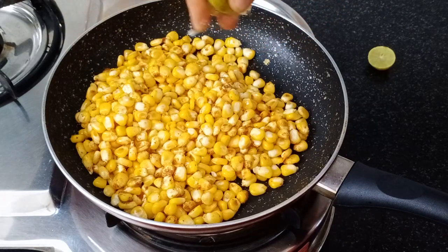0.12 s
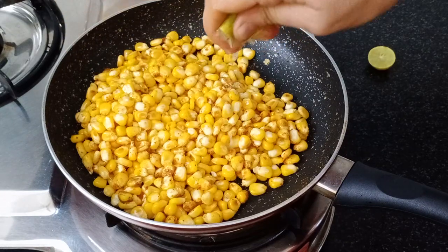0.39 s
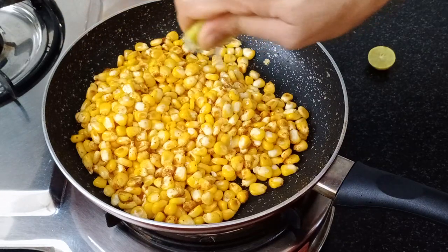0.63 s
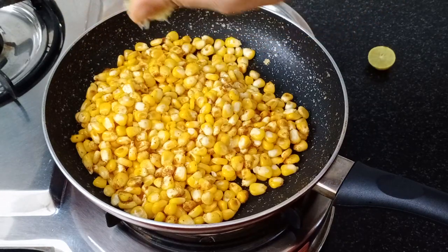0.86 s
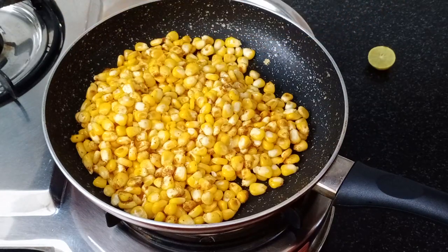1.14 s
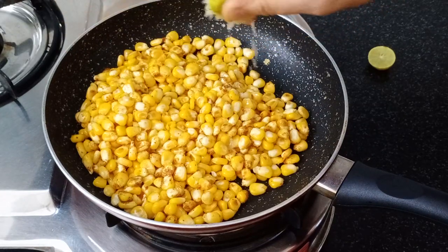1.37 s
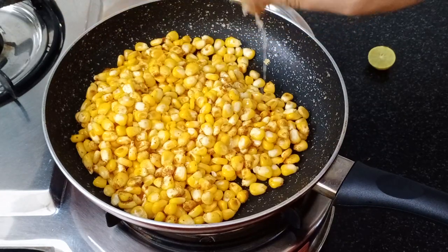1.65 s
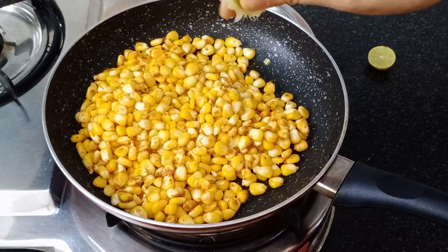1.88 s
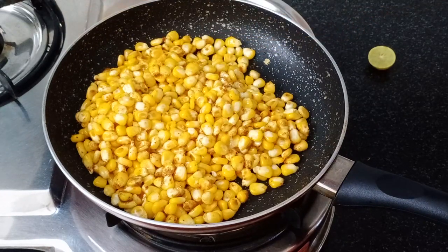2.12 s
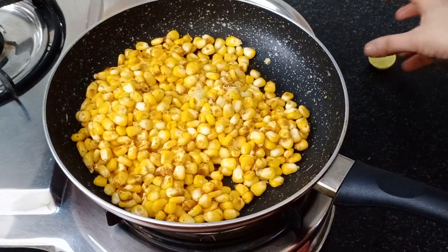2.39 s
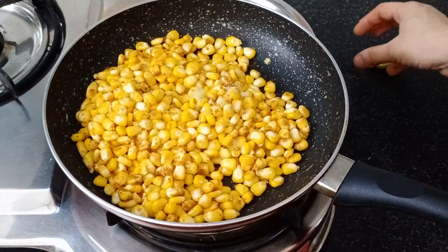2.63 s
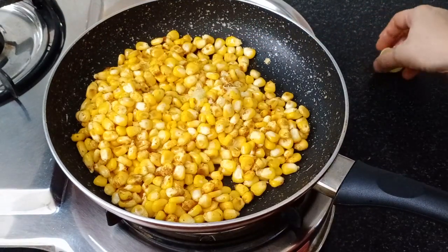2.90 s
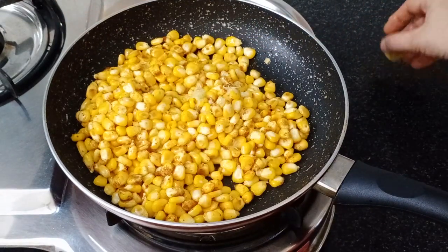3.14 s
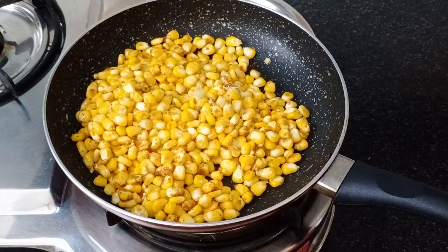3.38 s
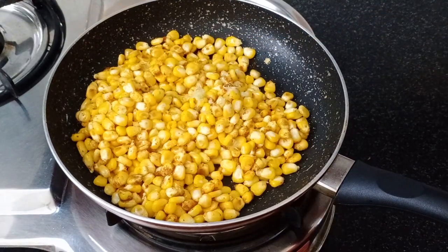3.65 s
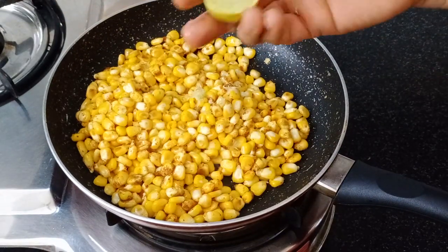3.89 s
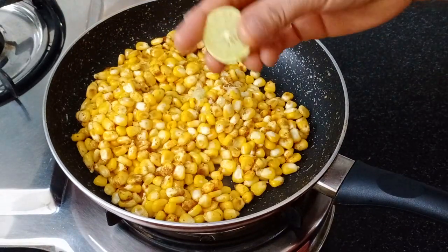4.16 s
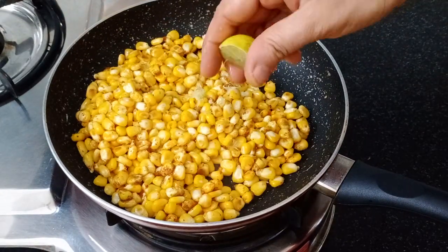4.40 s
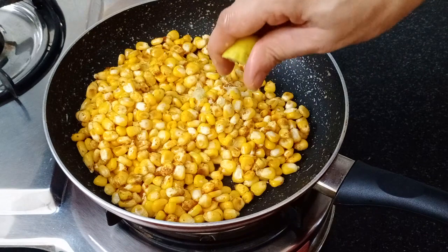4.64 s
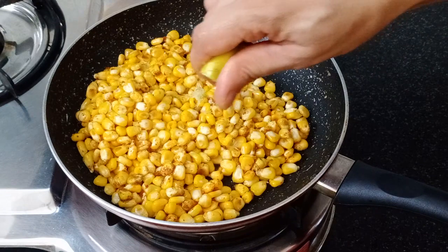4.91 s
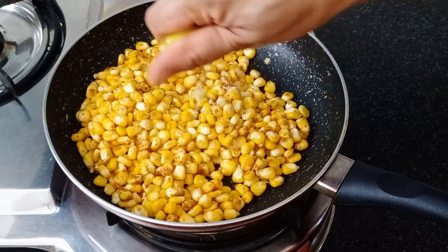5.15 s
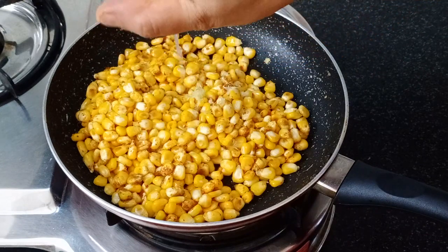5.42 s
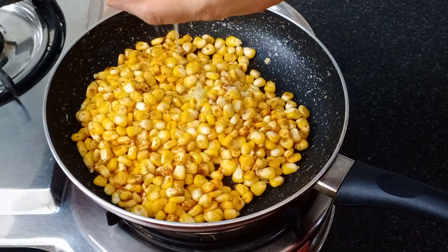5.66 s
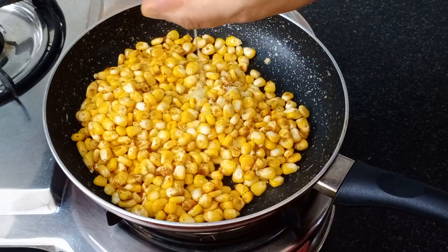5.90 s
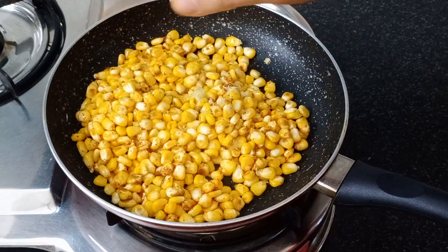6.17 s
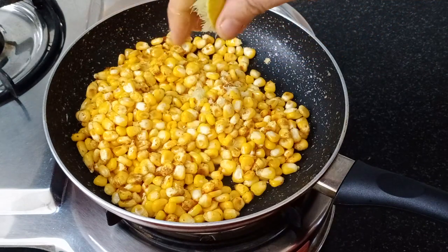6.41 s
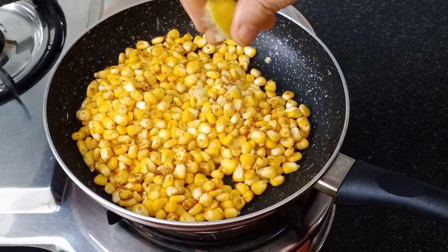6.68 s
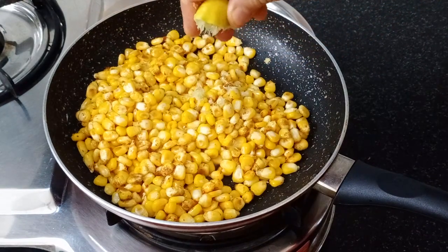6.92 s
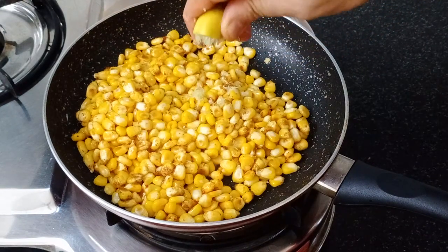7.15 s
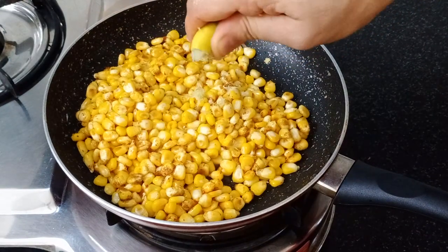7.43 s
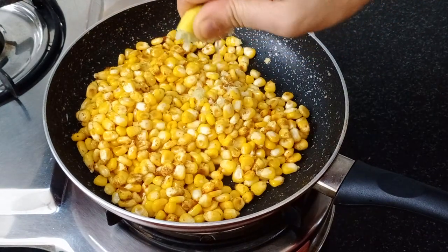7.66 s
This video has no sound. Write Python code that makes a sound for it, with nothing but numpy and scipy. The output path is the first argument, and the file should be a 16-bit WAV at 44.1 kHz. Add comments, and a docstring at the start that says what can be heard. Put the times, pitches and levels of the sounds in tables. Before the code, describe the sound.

Buttered corn wet with lemon juice fries in a hot pan, close to one small microphone in a kitchen. Dense bright crackle and hiss carry frequent sharp spits at first and grow slightly louder. Around two seconds the sound cuts out for a tenth of a second, then returns thinner and gradually calmer, with fewer pops. Later the sizzle swells a little, fuller, with a soft knock over faint low hum.

```python
"""Buttered corn wet with lemon juice sizzles in a hot pan, heard close by one small microphone.
Steam bubbles burst as random clicks over hiss, fizzing fat adds short pitched rings, and the pan resonates.
Sharp spits echo once, brief tones swell and fade, and a soft knock falls amid low hum and rumble of noise.
A noise suppressor thins the lows in patches; the sound drops out for a tenth of a second."""
import sys
import numpy as np
from scipy import signal
from scipy.fft import rfft, irfft
from scipy.io import wavfile
from scipy.ndimage import uniform_filter1d

SR = 44100
rng = np.random.default_rng(int(sys.argv[2]) if len(sys.argv) > 2 else 0)


def linear_from_db(decibels):
    """Turn decibels (scalar or array-like) into linear amplitude factors; 0 gives 1."""
    return 10 ** (np.asarray(decibels, float) / 20)


def file_out(sig):
    """Save sig as 16-bit WAV at sys.argv[1]."""
    # one column per channel
    cols = np.atleast_2d(sig).T
    # limit, then scale
    lim = np.clip(cols, -1, 1)
    pcm = np.round(lim * 32767).astype(np.int16)
    wavfile.write(sys.argv[1], SR, pcm)


N = 343980
FREQS = np.arange(N // 2 + 1) * SR / N + 1e-3   # spectrum bins [Hz], kept above zero for the logarithm

# colour of a burst at the microphone: (frequency [Hz], relative density [dB per Hz])
BURST_COLOUR = [(300, -37.5), (600, -24.5), (1150, -17.5), (1270, -13.5), (2050, -11.5), (2950, -9.5),
                (4600, -6), (6550, -4), (7450, -14.5), (9260, -31), (9850, -29), (11450, -27.5),
                (12350, -21.5), (15600, -16.5)]


def frying():
    """Source-filter principle: burst noise excites pan and microphone; band gains follow a set course."""
    # course of the frying: (time [s], main-band level [dB], low-band lift [dB],
    # bubble size as added body [dB], pan ringing [dB])
    course = [(0.0, -37.5, 1, 1.5, 0.5), (0.3, -37, 0.5, 1, 2.5), (0.62, -38.5, 2.5, 2, 2),
              (0.85, -36, -1.5, 1, -0.5), (1.15, -37, 2, .5, 1.5), (1.35, -35, -1, -2, 3),
              (1.65, -34.5, 1.5, -1, 2.5), (2.09, -34.5, 0.5, -0.5, -2), (2.214, -36, 4, 0.5, 0),
              (2.27, -38.5, -3.5, 1.5, 0), (2.8, -39.5, -4, 2.5, -2), (3.45, -39.5, -6, 0.2, 1.5),
              (3.8, -40, -3, 2.5, -4), (4.2, -40, -7.5, 1.5, 0), (4.6, -41, -5, 2, -0.5),
              (5.3, -41.5, -6.5, 2, 0), (5.85, -40.5, -5, 0.5, -1), (6.1, -39.5, -3, 4, 0.5),
              (6.38, -37.5, -4, 2.5, 0.5), (6.52, -37.5, -2.5, 1.5, 5), (6.88, -39, 2, 5, 3.5),
              (7.1, -38, -2, 5.5, -1), (7.4, -38.5, 0.5, 4, 0.5), (7.8, -38.5, -3.5, 5, 3.5)]
    # what each band below the main one follows, deepest first:
    # (share of low-band lift [dB/dB], share of bubble size [dB/dB], share of pan ringing [dB/dB])
    follows = [(1.13, 0.067, 0.0), (0.42, 0.0, 0.57), (0.38, 0.57, 0.0), (0.003, 1, 0.14)]
    bubbling_db, top_hiss_db = -8.5, -13   # against the bursts; against the main band
    low_waver_db, low_waver_hz = 0.94, 2.7   # the low bands waver in level

    time_s, *columns = np.transpose(course)
    level_db, low_lift_db, size_db, ring_db = [np.interp(np.arange(N) / SR, time_s, c) for c in columns]
    excitation = bursts(per_s=6000, spread_db=3.5, clump_db=1.5, hiss_db=-0.5)
    excitation = rfft(excitation + linear_from_db(bubbling_db) * bubbling())

    bare = causal(gain_at(BURST_COLOUR, FREQS))
    direct = np.array(split(excitation * bare))
    ringing = np.array(split(excitation * (colour() - bare)))
    *lower, main, top = direct + linear_from_db(ring_db) * ringing

    low_lift_db = low_lift_db + low_waver_db * drift(low_waver_hz)
    lift_db = np.array(follows) @ [low_lift_db, size_db, ring_db]
    body = np.sum(lower * linear_from_db(lift_db), axis=0) + main
    top_hiss = linear_from_db(top_hiss_db) * rms_one(below_cutoff(top))
    return linear_from_db(level_db) * (body / np.std(main) + top_hiss)


def bursts(per_s, spread_db, clump_db, hiss_db):
    """Shot noise: bubbles burst as clicks of uneven size, in clumps, over smooth steam hiss; rms 1."""
    sizes = linear_from_db(spread_db * np.minimum(rng.exponential(1, N), 4.5))
    sizes = sizes * rng.choice([-1, 1], N)
    clumping = linear_from_db(clump_db * (drift(60) + drift(12)))
    born = rng.random(N) < per_s * clumping / SR
    return rms_one(rms_one(sizes * born) + linear_from_db(hiss_db) * rng.standard_normal(N))


def bubbling():
    """Damped resonance: spots of fat fizz at pitches of their own, flaring and fading apart; rms 1."""
    lowest_hz, highest_hz = 2300, 8490
    ring_cycles = 28.5   # cycles in which a ring decays by 60 dB
    usual_per_s = 300   # births at each pitch, before the flaring
    out = 0
    for hz in np.geomspace(lowest_hz, highest_hz, 14):
        radius = linear_from_db(-60 * hz / (ring_cycles * SR))
        flaring = linear_from_db(5 * drift(6) + 3 * drift(30))
        born = rng.random(N) < usual_per_s * flaring / SR
        out = out + rms_one(resonate(born * rng.standard_normal(N), hz, radius))
    return rms_one(out)


def colour():
    """Modal resonance: Lorentzian peaks of the pan stand on the microphone colour."""
    # pan resonances: (frequency [Hz], half-height width [Hz], lift [dB])
    pan = [(415, 22, 10), (515, 23, 7), (717, 7.6, 7.5), (961, 27, 5.5), (1067, 20, 7.5), (1274, 16, 6.5),
           (1373.5, 29, 8.5), (1519, 20, 6), (1724, 11, 4), (2370, 8, 3), (2400, 27, -3.5), (2570, 13, 1.5),
           (2785, 17, 3.5), (3200, 12, 5.5), (4360, 490, 1.5), (5610, 550, 4)]
    peaks = 0
    for hz, width_hz, lift_db in pan:
        peaks = peaks + (linear_from_db(lift_db) - 1) / (1 + (2 * (FREQS - hz) / width_hz) ** 2)
    return causal(gain_at(BURST_COLOUR, FREQS) * (1 + peaks))


def spits():
    """Impulse response: each spit is one sharp burst of its own brightness, echoed by the pan wall."""
    # loud spits, levels before the echo: (time [s], peak of the body [dB], peak of the top band [dB])
    spit_list = [(0.1004, -17, -25), (0.1507, -18, -39), (0.2177, -20, -37), (0.2769, -17, -44),
                 (0.316, -19.5, -34), (0.3556, -20, -31), (0.4568, -19.5, -50), (0.5168, -14.5, -33),
                 (0.6068, -20, -46), (0.7538, -15, -43), (0.7924, -20, -33), (0.8731, -15, -42),
                 (1.1138, -21.5, -42), (1.3554, -18, -42), (1.843, -21, -40), (2.0795, -29, -42),
                 (2.4221, -16.5, -42), (2.4898, -22, -46), (2.519, -22, -28), (2.6495, -21.5, -48),
                 (2.9459, -18, -50), (3.1909, -27, -47), (3.5988, -18.5, -46), (3.7019, -25, -42),
                 (4.0794, -25, -35), (4.1052, -25, -45), (5.429, -27, -37), (6.753, -24, -32),
                 (6.9815, -24, -49), (7.0057, -20, -48), (7.5255, -30, -51)]
    echo_db, echo_s = -8.5, 0.00121

    time_s, peak_db, top_db = np.transpose(spit_list)
    at = np.round(time_s * SR).astype(int)
    signs = rng.choice([-1, 1], len(at))
    *body, top = split(colour())
    out = 0
    for pulse, level_db in [(sum(body), peak_db), (below_cutoff(top), top_db)]:
        clicks = np.zeros(N)
        clicks[at] = signs * linear_from_db(level_db)
        out = out + irfft(rfft(clicks) * rfft(pulse), N) / np.abs(pulse).max()
    return out + linear_from_db(echo_db) * np.roll(out, round(echo_s * SR))


def swells():
    """Amplitude and frequency modulation: sines under Gaussian envelopes, slightly unsteady in pitch."""
    # brief tones: (time of crest [s], frequency [Hz], rms at the crest [dB], three standard deviations [s])
    tones = [(0.22, 533, -60.5, 0.042), (1.655, 418, -60, 0.057), (1.826, 415, -55.5, 0.12),
             (2.433, 966, -62.5, 0.1), (2.696, 913, -63.5, 0.16), (3.339, 960, -62, 0.06),
             (3.045, 972, -63.5, 0.31), (3.729, 199, -55.5, 0.024), (3.715, 85, -62, .12),
             (3.72, 140.5, -63, .06), (4.148, 247, -61.5, 0.16), (4.805, 516, -64.5, 0.1),
             (5.703, 513, -67.5, 0.1), (6.106, 767, -61, 0.054), (6.153, 248.5, -58, 0.026),
             (6.366, 309, -68.5, 0.2), (6.637, 422, -63.5, 0.13), (6.715, 244, -57.5, 0.047),
             (6.917, 421, -68, 0.11)]
    t, out = np.arange(N) / SR, 0
    for crest_s, hz, level_db, length_s in tones:
        unsteady_hz = hz * (1 + 0.02015 * drift(30.5))
        phase = 2 * np.pi * np.cumsum(unsteady_hz) / SR
        envelope = np.exp(-0.5 * ((t - crest_s) / (0.33 * length_s)) ** 2)
        out = out + linear_from_db(level_db) * np.sqrt(2) * np.sin(phase) * envelope
    return out


def kitchen():
    """Filtered noise gives hum and rumble; a critically damped pulse gives one soft low knock."""
    # hum: (frequency [Hz], width [Hz], rms level [dB])
    hum = [(87.3, 9.7, -75), (174, 33, -79.5), (248, 16, -72)]
    # rumble spectrum, before a roll-off above 400 Hz: (frequency [Hz], relative density [dB per Hz])
    rumble_colour = [(12, -50), (20, -32), (91, 0.5), (134, -7), (245, -3), (311, -9.5), (400, 1.5),
                     (520, -55), (880, -120)]
    rumble_db = -70
    knock_s, knock_peak_db, knock_hz = 6.806, -38, 1100   # start, peak, brightness

    rumble_gain = gain_at(rumble_colour, FREQS) / (1 + (FREQS / 400) ** 6)
    rumble = irfft(rfft(rng.standard_normal(N)) * rumble_gain, N)
    out = linear_from_db(rumble_db) * rms_one(rumble)
    for hz, width_hz, level_db in hum:
        out = out + linear_from_db(level_db) * narrow(hz, width_hz, waver_db=1.5, rate_hz=8.3)
    since = np.maximum(np.arange(N) / SR - knock_s, 0) * 2 * np.pi * knock_hz   # radians
    return out + linear_from_db(knock_peak_db) * np.e * since * np.exp(-since)


def narrow(hz, width_hz, waver_db, rate_hz):
    """Narrow-band noise: a resonance passes one tone of it, its level wavering; rms 1."""
    tone = resonate(rng.standard_normal(N), hz, np.exp(-np.pi * width_hz / SR))
    return rms_one(tone * linear_from_db(waver_db * drift(rate_hz)))


def resonate(x, hz, radius):
    """Two-pole resonance: the pole radius is the decay per sample, the pole angle the pitch."""
    poles = [1, -2 * radius * np.cos(2 * np.pi * hz / SR), radius * radius]
    return signal.lfilter([1, 0, -1], poles, x)


def drift(rate_hz):
    """Low-passed noise: slow chance of rms 1, from a double one-pole filter on every 40th sample."""
    r = np.exp(-2 * np.pi * rate_hz * 40 / SR)
    slow = signal.lfilter([1], [1, -2 * r, r * r], rng.standard_normal(N // 40 + 2002))
    slow = slow[2000:]   # skip the filter's settling
    return np.interp(np.arange(N) / 40, np.arange(len(slow)), rms_one(slow))


def rms_one(x):
    """Normalisation of power: scale to rms 1."""
    return x / np.sqrt(np.mean(x ** 2) + 1e-20)


def gain_at(points, hz):
    """Spectral envelope: gain read from (Hz, dB) points on a log-frequency axis."""
    point_hz, point_db = np.transpose(points)
    return linear_from_db(np.interp(np.log(hz), np.log(point_hz), point_db))


def causal(gain):
    """Minimum phase: folding the cepstrum forward in time keeps clicks from sounding early."""
    cepstrum = irfft(np.log(gain), N)
    cepstrum[1:N // 2] *= 2
    cepstrum[N // 2 + 1:] = 0
    return np.exp(rfft(cepstrum))


def split(spectrum):
    """Complementary filtering: overlapping bands that add up to the whole."""
    # crossovers between the six bands: (frequency [Hz])
    band_edges_hz = [1200, 1700, 2900, 4800, 9300]
    above = [1 / (1 + (edge / FREQS) ** 16) for edge in band_edges_hz]
    shares = -np.diff([np.ones_like(FREQS)] + above + [np.zeros_like(FREQS)], axis=0)
    return [irfft(spectrum * share, N) for share in shares]


def below_cutoff(x):
    """Ideal low-pass: the spectrum ends abruptly at 15740 Hz."""
    return irfft(rfft(x) * (FREQS < 15740), N)


def scene():
    """Superposition: all sources add at one microphone."""
    return np.tile(frying() + spits() + swells() + kitchen(), (2, 1))


def suppress(x):
    """Spectral gating: turning down cells not above their threshold leaves patches and wavering tones."""
    # suppressor threshold: (frequency [Hz], level over the usual level [dB])
    threshold = [(60, 5), (300, 1.5), (700, 6.5), (1150, 1), (1350, 1.5), (2100, 2), (3100, -1),
                 (4100, -5.5), (6100, -15), (9000, -28)]
    suppress_db, knee_db = 7.5, 1

    hz, _, cells = signal.stft(x, SR, nperseg=1024, noverlap=768)
    power = uniform_filter1d(np.abs(cells) ** 2, size=9, axis=1)   # smooth in time
    power = uniform_filter1d(power, size=3, axis=0)   # and in frequency
    level_db = 10 * np.log10(power + 1e-20)
    usual_db = uniform_filter1d(np.median(level_db, axis=1), size=7)
    threshold_db = usual_db + 20 * np.log10(gain_at(threshold, hz + 1))
    over_db = level_db - threshold_db[:, None]
    turned_down = 0.5 - 0.5 * np.tanh(over_db / knee_db / 2)   # 0 well above threshold, 1 well below
    gain = linear_from_db(-suppress_db * turned_down)
    return signal.istft(cells * gain, SR, nperseg=1024, noverlap=768)[1][:N]


def top_cut(x):
    """Nothing passes above the cut-off."""
    return signal.sosfilt(signal.butter(12, 17080, fs=SR, output="sos"), x)


def record(dry):
    """Gating and band-limiting: noise suppression, the top cut, then a short mute with soft edges."""
    mute_start_s, mute_end_s, edge_s = 2.1027, 2.2054, 0.0004
    t = np.arange(N) / SR
    outside_s = np.maximum(mute_start_s - t, t - mute_end_s)
    unmuted = np.clip(outside_s / edge_s, 0, 1)
    mono = below_cutoff(suppress(dry[0])) * unmuted
    mix = np.tile(mono, (2, 1))
    return top_cut(mix)


dry = scene()
out = record(dry)
file_out(out)
```